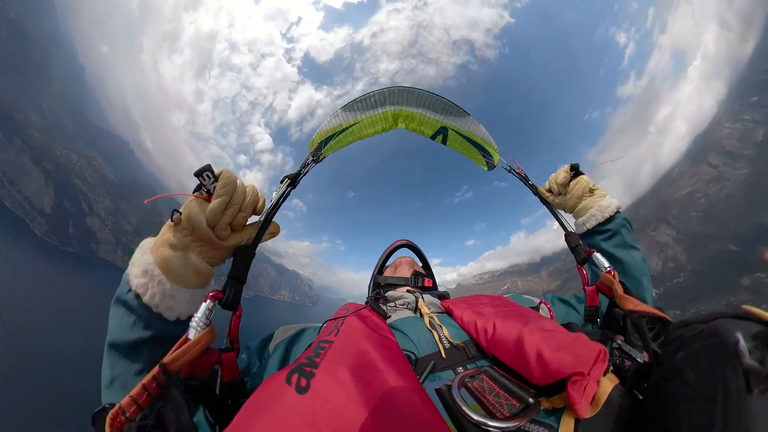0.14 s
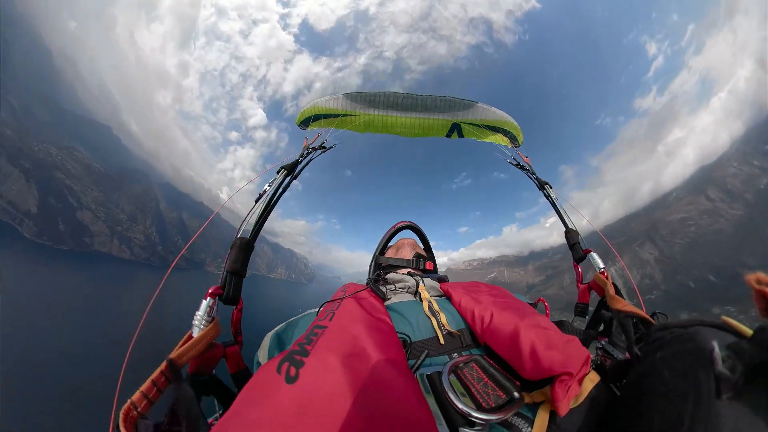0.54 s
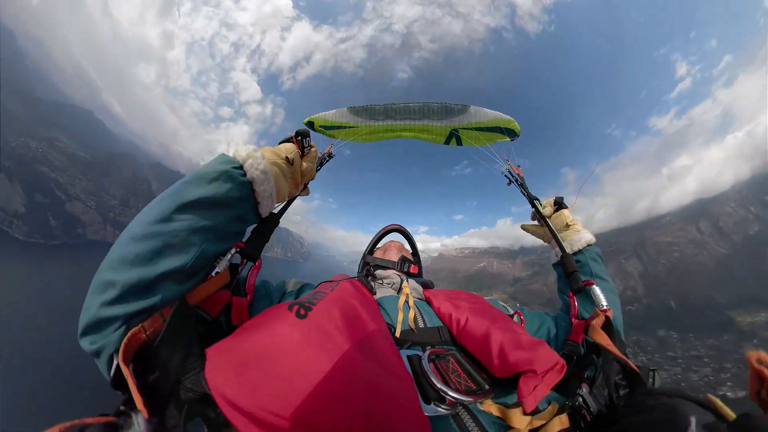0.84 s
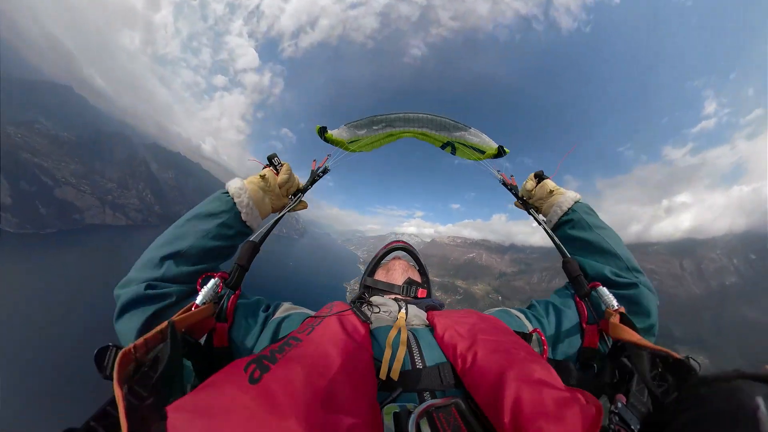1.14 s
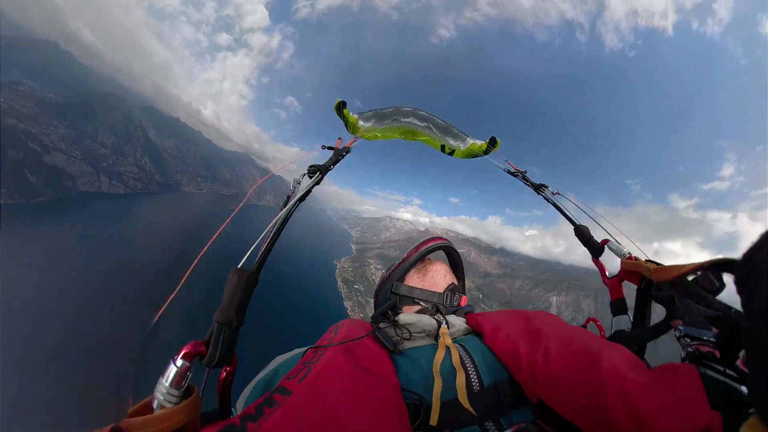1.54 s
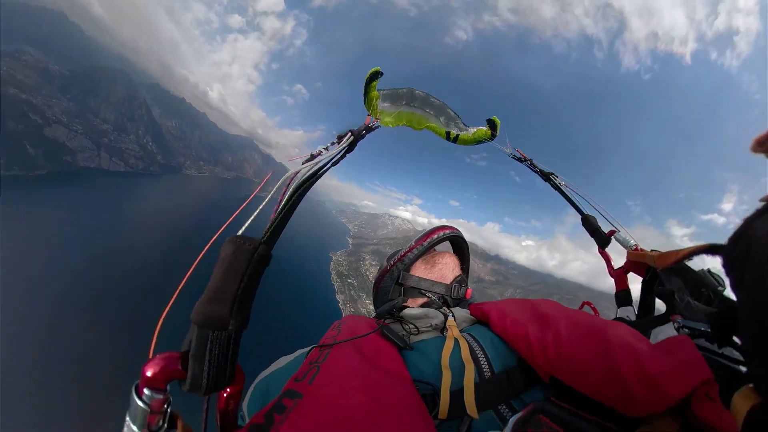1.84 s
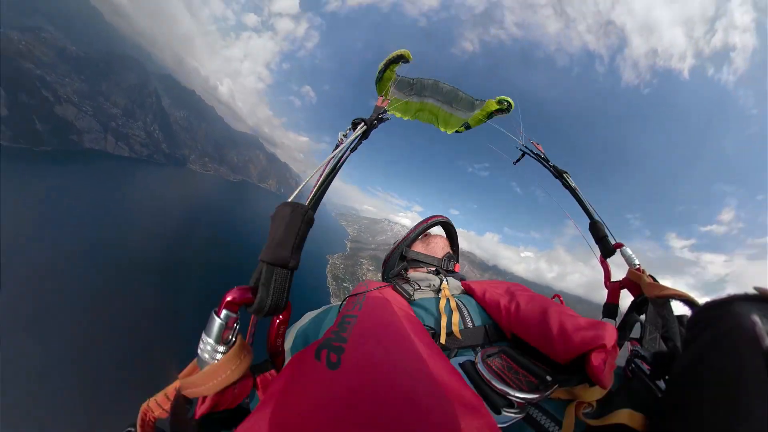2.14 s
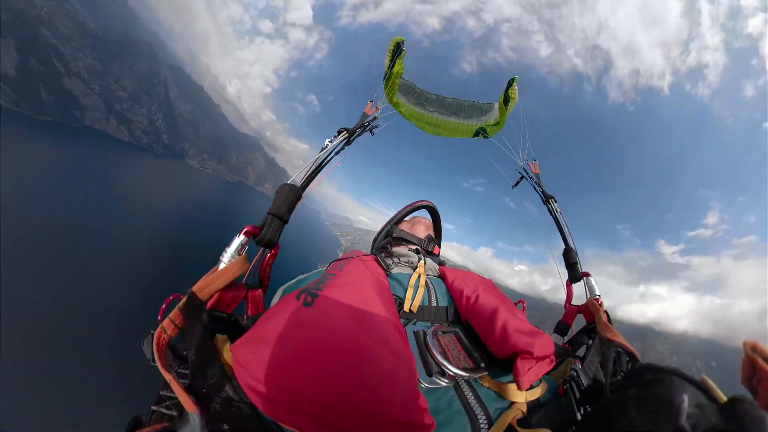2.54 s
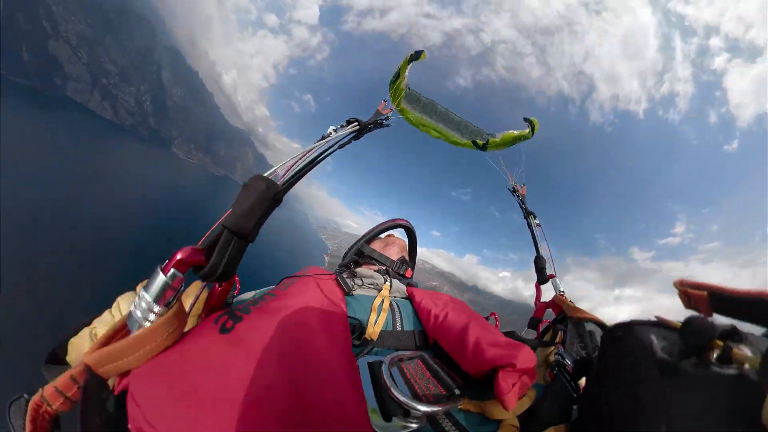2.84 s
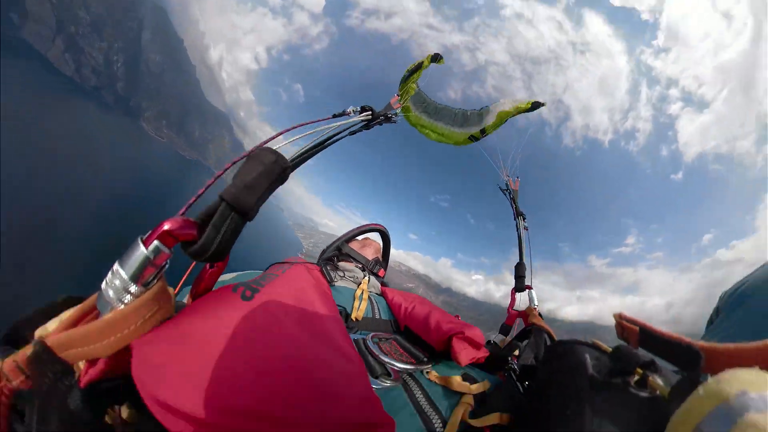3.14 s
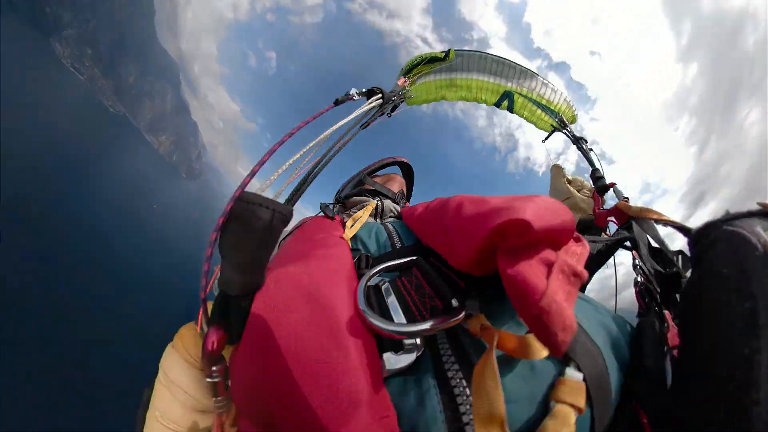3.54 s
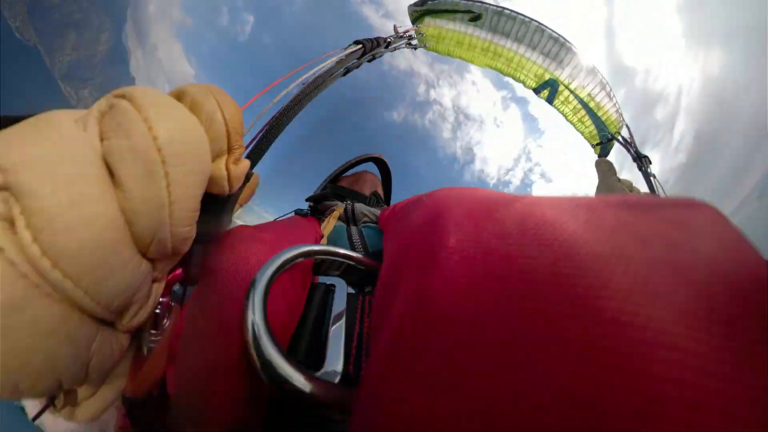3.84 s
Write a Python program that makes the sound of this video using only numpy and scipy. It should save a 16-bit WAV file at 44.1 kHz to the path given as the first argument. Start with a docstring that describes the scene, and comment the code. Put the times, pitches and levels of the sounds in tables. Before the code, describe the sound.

Gusty wind roars on a paraglider pilot's microphone while webbing crackles and gear knocks in bursts

```python
"""High in gusty air, a microphone in a housing is strapped to a paraglider pilot.
Wind is noise in seven colours, from rumble to sizzle, that flickers with shared eddies; large eddies add
thumps, each a few cycles of a wave. Cloth and webbing crackle in random puffs of noise, and gear knocks with
a crack, a low body and a ring. Short chirps squeak, shaped noise scrapes and ticks, a strap buzzes briefly
in regular pulses, and sharp bright clicks sound as the input overloads."""
import sys
import numpy as np
from scipy import signal
from scipy.fft import rfft, irfft
from scipy.io import wavfile
from scipy.ndimage import uniform_filter1d

SR = 44100
rng = np.random.default_rng(int(sys.argv[2]) if len(sys.argv) > 2 else 0)


def unload_wav(signal):
    """Save mono or channel-first audio to the path in sys.argv[1] as 16-bit WAV at rate SR, clipped to [-1, 1]."""
    wavfile.write(
        sys.argv[1],
        SR,
        np.round(np.clip(np.atleast_2d(signal).T, -1, 1) * 32767).astype(np.int16),
    )


def invert_db(level):
    """Linear amplitude ratio for a level in decibels (20 dB per decade), elementwise."""
    return 10 ** (np.asarray(level, dtype=float) / 20)


N = 176400  # samples, 4 s
T = np.arange(N) / SR

# In every colour table below, level_db is per hertz and only the shape counts.

# Bright ticks, before a common lift: start_s, level_db, t60_s (time to fade by 60 dB)
TICKS = [(.435, -47.5, 0.021), (.664, -55, .02), (.671, -51.5, 0.04), (.751, -54, 0.032), (.759, -55, .02),
         (.787, -54, .02), (.81, -53, .02), (.835, -60.5, 0.026), (.87, -55, .03), (1.26, -58, 0.026)]
# Colour of the treble, for ticks and sizzle: pitch_hz, level_db
TREBLE_COLOUR = [(6000, -11), (8000, -20.5), (10000, -16.5), (11300, -9), (11900, -0.5), (12800, 1.5),
                 (13800, -6), (15300, -11.5), (15700, -32.5)]
# Sharp bright clicks as the input overloads, before colouring: start_s, level_db
OVERLOAD_CLICKS = [(1.7793, -45), (1.7962, -39.5), (1.8327, -40), (1.865, -54), (1.8763, -42),
                   (1.8973, -39), (1.908, -51), (1.9188, -41), (1.9295, -44), (1.9499, -41), (1.9549, -45),
                   (1.976, -44), (1.9826, -45), (1.993, -45)]
# Colour of the strap's buzz and of the overload clicks: pitch_hz, level_db
BUZZ_COLOUR = [(3000, -22.5), (5500, -4), (9000, -1.5), (11500, -7.5), (14500, -11), (15600, -47)]
# Short squeaks of a strap sliding: start_s, length_s, level_db, start_hz, end_hz
SQUEAKS = [(.8798, .0095, -24, 1330, 3300), (.3155, .010, -36, 3400, 3450), (.324, .012, -42, 2900, 3500)]
# A glove or strap scrapes past, before colouring: start_s, length_s, level_db
SCRAPES = [(.288, .06, -45), (.588, .016, -53), (.879, .018, -40)]
# Crackle of cloth and webbing under load: time_s, level_db
CRACKLE_LEVEL = [(0, -73), (.3, -62), (.5, -95), (.635, -75), (.66, -55), (1.1, -49), (1.4, -60),
                 (1.7, -53), (1.8, -46), (1.85, -41), (1.92, -41), (1.96, -45), (2.03, -43), (2.07, -56),
                 (2.45, -59), (2.7, -65), (2.95, -78), (3.05, -49), (3.28, -63), (3.33, -43), (3.39, -38),
                 (3.48, -45), (3.53, -59.5), (3.7, -54), (3.85, -66), (4, -61)]
# Colour of crackle heard through the housing: pitch_hz, level_db
HOUSING_COLOUR = [(100, -21), (300, -8.5), (600, -14.5), (950, 6.5), (1250, -7.5), (1700, -5.5),
                  (2500, -18), (3500, -25), (4000, -21), (5500, -34.5), (8000, -59.5), (15000, -96.5)]
# Knocks and snaps of the gear, before colouring: start_s, crack_db, body_re_crack_db, crack_t60_s
KNOCKS = [(0.4267, -37, 20.5, 0.0088), (0.4553, -37, 6, 0.011), (0.596, -50, -25, 0.0093),
          (0.6624, -27, 5.5, 0.011), (0.752, -46, 14, 0.023), (0.7756, -44, 11, 0.014),
          (0.9248, -34, -15, 0.023), (0.9547, -60, -10, 0.013), (1.4765, -41, -2, 0.015),
          (1.484, -27.5, -6, 0.024), (1.531, -37, -9, 0.016), (1.614, -41, 9, 0.013),
          (1.6374, -24, -3, 0.018), (1.708, -28, 2, 0.015), (1.7616, -45, 7.5, 0.019),
          (1.7824, -26, -1.5, 0.023), (1.8038, -27, -6, 0.023), (1.815, -25, 2, 0.031),
          (1.8297, -24, -5, 0.039), (1.8361, -21.5, -7, 0.018), (1.8428, -32.5, 16, 0.021),
          (1.8491, -18.5, -17, 0.014), (1.8539, -20, -15, 0.012), (1.8672, -17, -2, 0.015),
          (1.880, -34, 8, 0.02), (1.891, -22, 6.5, 0.0096), (1.8946, -19.5, -8, 0.013),
          (1.9048, -26.5, -3, 0.028), (1.911, -29, -3, 0.016), (1.921, -34, 1, 0.014),
          (1.9312, -26.5, -1, 0.013), (1.947, -27, -7, 0.015), (1.971, -26, -1.5, 0.026),
          (1.9905, -21, -11.5, 0.027), (2.001, -27, 4.5, 0.014), (2.0225, -31.5, 1.5, 0.025),
          (2.0348, -26, 5, 0.017), (2.084, -41, 15, 0.016), (2.092, -41.5, -5, 0.011),
          (2.110, -45, -8, 0.01), (2.1308, -34.5, 9.5, 0.0067), (2.178, -37.5, 4.5, 0.012),
          (2.1832, -41.5, 7.5, 0.011), (2.200, -49.5, 13, 0.013), (2.2538, -37, 8.5, 0.016),
          (2.2808, -45.5, 13.5, 0.0094), (2.2977, -41, 3, 0.012), (2.3032, -38.5, 12, 0.011),
          (2.318, -49, -2, 0.01), (2.3229, -33, 6, 0.011), (2.3655, -40, 9, 0.02),
          (2.380, -41.5, 10, 0.017), (2.4142, -43.5, 6.5, 0.01), (2.4383, -42, 17, 0.018),
          (2.462, -56, 10, 0.016), (2.4885, -47.5, 23, 0.02), (2.5594, -57, 19, 0.014),
          (2.603, -49, 9, 0.018), (2.6214, -46, -5, 0.016), (2.681, -50.5, 12, 0.016),
          (3.021, -45, 9, 0.021), (3.038, -31, 6, 0.015), (3.0457, -23.5, -3, 0.016),
          (3.061, -42, -5, 0.028), (3.0744, -35, 8, 0.023), (3.1058, -44.5, 17.5, 0.036),
          (3.142, -28.5, -5, 0.016), (3.2131, -20.5, -1, 0.014), (3.2222, -17, -13, 0.0091),
          (3.3224, -23.5, -0.5, 0.031), (3.3701, -23, -8, 0.014), (3.385, -31, 0, 0.021),
          (3.3935, -23.5, 6.5, 0.02), (3.3968, -17, 3, 0.0096), (3.4043, -19.5, -8, 0.016),
          (3.414, -33.5, 6, 0.012), (3.432, -35, 12, 0.02), (3.4368, -25, -1.5, 0.0095),
          (3.461, -30.5, 3, 0.014), (3.522, -37, 11.5, 0.016), (3.5266, -34, 13, 0.017),
          (3.5468, -30.5, 9, 0.0096), (3.5634, -15.5, -1, 0.0095), (3.565, -27.5, 6, 0.0099),
          (3.583, -35, 1.5, 0.014), (3.6515, -34.5, 9, 0.027), (3.6723, -35, 5.5, 0.017),
          (3.7266, -38, 1.5, 0.017), (3.9227, -15.5, -7, 0.013), (3.963, -38, 3, 0.015)]
# Colour of a knock's crack: pitch_hz, level_db
CRACK_COLOUR = [(600, -18.5), (1250, -1.5), (1700, 3.5), (2100, 1.5), (2500, -0.5), (3500, -8.5),
                (4000, -20), (5500, -25), (8000, -44.5), (15000, -72)]
# Colour of a knock's low body: pitch_hz, level_db
BODY_COLOUR = [(150, -30.5), (350, -2.5), (600, -3), (900, -0.5), (1100, -7.5), (1400, -14.5),
               (2200, -35.5), (5000, -88.5)]
# Ring of the housing and buckles, levels relative to each other: pitch_hz, level_db, t60_s
RING = [(900, -11, .045), (1650, -17, .03), (2350, -20, .08), (3300, -20, .025)]
# Deep thumps of large eddies: start_s, level_db, pitch_hz, length_cycles
THUMPS = [(0.316, -18, 127, 3.5), (0.425, -20.5, 148, 2.8), (0.673, -20.5, 268, 4.1),
          (0.752, -20.5, 255, 1.9), (0.766, -19, 277, 6), (0.826, -17.5, 113, 2), (0.888, -14.5, 96, 1.2),
          (0.956, -19, 89.6, 2.7), (1.595, -17, 115, 1.3), (1.754, -10.5, 88.5, 4), (2.759, -21, 89, 2.2),
          (2.875, -18.5, 134, 2.5), (3.36, -6.5, 90, 2.47), (3.396, -11, 129, 1.2), (3.44, -9.5, 110, 3.1),
          (3.543, -13, 141, 2.2), (3.517, -6, 156.4, 5), (3.566, -7, 170, 2), (3.726, -8.5, 158.6, 2.64)]
# Deep wind, one list for each spell: time_s, rumble_db, buffeting_db
GUSTS = [
    [(0.02, -17.5, -26), (0.054, -20, -47), (0.104, -26, -45), (0.336, -28.5, -25), (0.362, -33, -33.5),
     (0.58, -46, -34.5), (0.598, -22, -55), (0.63, -55, -50)],
    [(0.63, -59, -52), (0.642, -31.5, -37.5), (0.848, -45, -25.5), (0.87, -34, -33), (0.952, -26.5, -29.5),
     (1.396, -42, -43), (1.414, -32, -36.5), (1.58, -31, -40)],
    [(1.58, -37, -33), (1.602, -17.5, -33), (1.64, -12.5, -14.5), (1.678, -23.5, -42), (1.708, -13, -17.5),
     (1.732, -25, -36), (1.784, -16, -20), (2.06, -23, -16.5)],
    [(2.06, -19, -17), (2.436, -16.5, -31), (2.466, -17, -45), (2.5, -18, -23), (2.562, -21, -37),
     (2.896, -16.5, -27), (2.918, -14.5, -56), (2.96, -26, -60)],
    [(2.96, -27, -75), (2.976, -18.5, -28), (3.02, -20.5, -42), (3.034, -20.5, -27), (3.148, -16.5, -20.5),
     (3.212, -8, -24), (3.276, -31.5, -25.5), (3.31, -24, -32)],
    [(3.31, -13, -34), (3.358, -14.5, -20.5), (3.572, -22, -18.5), (3.618, -15.5, -33.5),
     (3.646, -25, -16.5), (3.786, -13, -35), (3.804, -20, -34.5), (3.98, -23, -22)],
]
# Middle wind, one list for each spell: time_s, flutter_db, roar_db
FLOW = [
    [(0.0, -20, -32.5), (0.035, -29.5, -47), (0.09, -45.5, -48.5), (0.154, -42.5, -50), (0.246, -36, -46),
     (0.344, -44, -38), (0.362, -44, -43), (0.41, -43, -44.5), (0.432, -35, -43), (0.494, -42, -44),
     (0.575, -45, -50.5), (0.628, -43, -51)],
    [(0.632, -47, -55), (0.642, -37.5, -38), (0.68, -29, -34.5), (0.73, -31, -44), (0.76, -30.5, -33),
     (0.838, -31, -37.5), (1.15, -40.5, -46), (1.172, -52, -45), (1.242, -36.5, -43), (1.384, -44.5, -47),
     (1.462, -32, -46), (1.58, -33.5, -42.5)],
    [(1.58, -39, -46), (1.6, -21.5, -51), (1.624, -20, -38), (1.692, -41.5, -51), (1.72, -29, -46),
     (1.844, -30, -33), (1.964, -33, -37), (2.014, -23, -32.5), (2.06, -31, -41.5)],
    [(2.06, -35, -44.5), (2.23, -59.5, -54), (2.268, -38.5, -44.5), (2.508, -40.5, -55.5),
     (2.518, -46.5, -59.5), (2.7, -45, -57), (2.76, -33.5, -43), (2.868, -36.5, -52.5), (2.96, -61, -59.5)],
    [(2.96, -45, -54), (3.018, -52, -64), (3.032, -38.5, -52), (3.076, -39.5, -45), (3.146, -31, -46.5),
     (3.214, -40, -50.5), (3.304, -51, -47.5), (3.31, -35, -55.5)],
    [(3.31, -42.5, -60), (3.388, -19, -35), (3.496, -34, -47.5), (3.532, -20, -34), (3.63, -42.5, -64),
     (3.742, -29.5, -45.5), (3.836, -56, -61), (3.866, -39, -53), (3.98, -35.5, -61.5)],
]
# Hiss of the airflow: time_s, level_db
HISS_LEVEL = [(0, -51), (.15, -63.5), (.25, -54.5), (.38, -52.5), (.5, -58.5), (.62, -59.5), (.67, -53.5),
              (.85, -48), (1.07, -52), (1.2, -55.5), (1.38, -58.5), (1.55, -56.5), (1.65, -53.5),
              (1.72, -59.5), (1.87, -49), (1.97, -58), (2.06, -63.5), (2.2, -72), (2.5, -71.5), (2.68, -70),
              (2.76, -57.5), (2.9, -61), (2.96, -68.5), (3.03, -59.5), (3.2, -61), (3.3, -59), (3.4, -48.5),
              (3.5, -61.5), (3.63, -64), (3.74, -59), (3.85, -64.5), (4, -65.5)]
# Bright sizzle: time_s, level_db
SIZZLE_LEVEL = [(0, -100), (.3, -100), (.42, -76), (.47, -67.5), (.62, -74), (.68, -63), (.85, -62.5),
                (.95, -65.5), (1.1, -63.5), (1.25, -63), (1.4, -67), (1.6, -64.5), (1.8, -69), (1.86, -100),
                (2.1, -115), (4, -115)]
# Duller sizzle: time_s, level_db
FIZZ_LEVEL = [(0, -68), (.2, -84.5), (.27, -73.5), (.4, -74), (.5, -81), (.65, -84), (.8, -78),
              (1.6, -77.5), (1.85, -110), (4, -115)]
# Colours of the wind layers, from deep to bright: pitch_hz, level_db
RUMBLE_COLOUR = [(10, -9), (20, 7), (35, 4), (55, -2), (75, -20), (110, -30.5), (200, -70), (600, -120)]
BUFFET_COLOUR = [(30, -36), (55, -1.5), (75, 1), (110, -2.5), (160, -8), (220, -24.5), (350, -31.5),
                 (600, -65.5), (1500, -120)]
FLUTTER_COLOUR = [(70, -40), (130, -2.5), (180, 3), (280, -2.5), (380, -12.5), (500, -20.5), (800, -24.5),
                  (1200, -59), (3000, -120)]
ROAR_COLOUR = [(200, -26.5), (380, -0.5), (500, -1.5), (700, -7), (900, -10.5), (1050, -11.5), (1250, -19),
               (2000, -36.5), (5000, -100)]
HISS_COLOUR = [(700, -23), (1200, -6), (1650, -2), (2000, -8), (2450, -1.5), (3000, -5.5), (3500, -9),
               (3900, -15.5), (5000, -19), (6500, -29.5), (8500, -53), (12000, -77)]
FIZZ_COLOUR = [(5000, -26), (8000, -8.5), (10300, -3), (12000, -7), (13500, -17.5), (15600, -44)]

RISE_S = .0012  # time a puff takes to reach full strength


def evened(x):
    """Scales a sound to an average (rms) strength of 1."""
    return x / np.sqrt(np.mean(x ** 2) + 1e-20)


def read(points, hz):
    """Reads a colour table at any pitch, with pitch spaced as the ear hears it."""
    table_hz, level_db = np.transpose(points)
    return np.interp(np.log(hz + 1), np.log(table_hz + 1), level_db)


def curve(table, count):
    """Turns one level column into a smooth loudness curve."""
    rows = np.vstack(table)
    level_db = np.interp(T, rows[:, 0], rows[:, count])
    return invert_db(uniform_filter1d(level_db, size=400))


def add(mix, s, sound):
    """Adds a sound into the mix at s seconds, cut off at the end."""
    part = mix[round(s * SR):][:len(sound)]
    part += sound[:len(part)]


def coloured(x, points):
    """Filters a sound to the given colour; the filter responds only after its input."""
    hz = abs(np.fft.fftfreq(8192, 1 / SR))
    log_gain = np.log(invert_db(read(points, hz)))
    # this phase packs the response as early as it can be
    phase = -signal.hilbert(log_gain).imag
    taps = np.fft.ifft(np.exp(log_gain + 1j * phase)).real[:4096]
    return signal.oaconvolve(x, taps / np.linalg.norm(taps))[:len(x)]


def puffs(rows):
    """Loudness of sudden puffs that rise fast and die away, from rows of start_s, level_db, t60_s."""
    out, t = np.zeros(N), T[:4000]
    for s, db, t60 in rows:
        rise = np.minimum(t / RISE_S, 1)
        add(out, s, rise * invert_db(db - 60 * t / max(t60, .004)))
    return out


def ticks():
    """Each bright tick is a dying puff of treble noise."""
    colour = [(5000, -19.5), (7000, -12.5)] + TREBLE_COLOUR[2:]
    return invert_db(3.0) * coloured(puffs(TICKS) * rng.standard_normal(N), colour)


def strap_buzz():
    """A strap buzzes against the housing in nearly regular short pulses of uneven force."""
    start_s, end_s, rate_hz, jitter_s = 1.7855, 2.012, 188, .00015
    level_db, spread_db = -58, 6  # before colouring
    at_s = np.arange(start_s, end_s, 1 / rate_hz)
    at_s = at_s + jitter_s * rng.standard_normal(len(at_s))
    force = np.minimum(rng.standard_normal(len(at_s)), 1.2)
    pulses = np.zeros(N)
    pulses[(at_s * SR).astype(int)] = invert_db(level_db + spread_db * force)
    return coloured(pulses, BUZZ_COLOUR)


def overload_clicks():
    """The overloading input gives sharp bright clicks, placed here at listed times."""
    start_s, level_db = np.transpose(OVERLOAD_CLICKS)
    clicks = np.zeros(N)
    clicks[(start_s * SR).astype(int)] = invert_db(level_db)
    return coloured(clicks, BUZZ_COLOUR)


def squeaks():
    """A sliding strap gives short upward chirps, slightly rough because the pitch wobbles."""
    out = np.zeros(N)
    for s, length, db, from_hz, to_hz in SQUEAKS:
        u = np.arange(0, length, 1 / SR) / length  # runs from 0 to 1
        wobble = 1 + .55 * uniform_filter1d(rng.standard_normal(2000), size=20)[:len(u)]
        hz = (from_hz + (to_hz - from_hz) * u ** 2) * wobble
        swell = np.sin(np.pi * u ** .45)
        add(out, s, invert_db(db) * swell * np.sin(2 * np.pi * np.cumsum(hz) / SR))
    return out


def scrapes():
    """Rubbing makes hissing noise that swells and fades."""
    rub = np.zeros(N)
    for s, length, db in SCRAPES:
        add(rub, s, invert_db(db) * np.hanning(round(length * SR)))
    return coloured(rub * rng.standard_normal(N), HISS_COLOUR)


def crackle():
    """Random snaps of uneven size, each a dying puff of noise heard through the housing."""
    snaps_per_s, spread_db, t60_s = 320, 5, .011
    size = invert_db(spread_db * np.minimum(rng.exponential(1, N), 3))
    snaps = size * (rng.random(N) < snaps_per_s / SR)
    fading = signal.lfilter([1], [1, -invert_db(-60 / t60_s / SR)], snaps)
    noise = coloured(fading * rng.standard_normal(N), HOUSING_COLOUR)
    return curve(CRACKLE_LEVEL, count=1) * evened(noise)


def knocks():
    """Each knock has a sharp impact, a crack and a low body; crack and body set the housing ringing."""
    start_s, crack_db, body_re_crack_db, t60_s = np.transpose(KNOCKS)
    body_db = crack_db + body_re_crack_db
    crack = puffs(np.c_[start_s, crack_db, t60_s]) * rng.standard_normal(N)
    body = puffs(np.c_[start_s, body_db, 1.3 * t60_s]) * rng.standard_normal(N)
    # one sharp click as the puff reaches full strength
    first = ((start_s + RISE_S) * SR).astype(int)
    snap, push = np.zeros(N), np.zeros(N)
    snap[first] = 3.5 * invert_db(crack_db)
    push[first] = 4 * invert_db(body_db)
    crack, body = crack + snap, body + push
    t = T[:8000]
    ring = sum(invert_db(db - 60 * t / t60) * np.sin(2 * np.pi * hz * t) for hz, db, t60 in RING)
    ringing = signal.oaconvolve(invert_db(-31) * crack + invert_db(-36.5) * body, ring)[:N]
    return invert_db(-10.0) * coloured(crack, CRACK_COLOUR) + invert_db(-4.5) * coloured(body, BODY_COLOUR) + ringing


def thumps():
    """A large eddy swings the pressure at the microphone port for a few cycles."""
    out = np.zeros(N)
    for s, db, hz, cycles in THUMPS:
        u = np.arange(0, cycles / hz, 1 / SR) * hz / cycles  # runs from 0 to 1
        swell = np.sin(np.pi * u ** 0.56) ** 2  # grows faster than it fades
        add(out, s, invert_db(db) * swell * np.sin(2 * np.pi * cycles * u))
    return out


def lumps(top_hz):
    """Slow random ups and downs, about equally strong in each octave from 7 Hz to near top_hz."""
    hz = np.fft.rfftfreq(N, 1 / SR)
    weight = (hz > 7) / np.sqrt(hz + 1) / (1 + (hz / top_hz) ** 4)
    return evened(irfft(rfft(rng.standard_normal(N)) * weight, N))


def air(points, eddies, shared_db, own_db, own_hz):
    """Noise of one colour that flickers with the shared eddies and on its own."""
    flicker = invert_db(shared_db * eddies + own_db * lumps(own_hz))
    return evened(flicker) * evened(coloured(rng.standard_normal(N), points))


def wind():
    """Turbulent air rumbles, roars and hisses; the same passing eddies make every layer flicker."""
    eddies = lumps(34)
    rumble = air(RUMBLE_COLOUR, eddies, shared_db=.25, own_db=.52, own_hz=17)
    buffeting = air(BUFFET_COLOUR, eddies, shared_db=.81, own_db=.77, own_hz=30)
    flutter = air(FLUTTER_COLOUR, eddies, shared_db=1.0, own_db=1.0, own_hz=50)
    roar = air(ROAR_COLOUR, eddies, shared_db=1.9, own_db=.99, own_hz=90)
    hiss = air(HISS_COLOUR, eddies, shared_db=.9, own_db=1.1, own_hz=150)
    sizzle = air(TREBLE_COLOUR, eddies, shared_db=.7, own_db=1.5, own_hz=200)
    fizz = air(FIZZ_COLOUR, eddies, shared_db=.7, own_db=1.9, own_hz=200)
    return (curve(GUSTS, count=1) * rumble
            + curve(GUSTS, count=2) * buffeting
            + curve(FLOW, count=1) * flutter
            + curve(FLOW, count=2) * roar
            + curve(HISS_LEVEL, count=1) * hiss
            + curve(SIZZLE_LEVEL, count=1) * sizzle
            + curve(FIZZ_LEVEL, count=1) * fizz)


def scene():
    """Adds all the sources into one channel."""
    gear = ticks() + strap_buzz() + squeaks() + scrapes() + crackle() + knocks()
    return (gear + overload_clicks() + thumps() + wind())[None]


def low_pass(x):
    """Removes everything above the highest recorded frequency."""
    return signal.sosfilt(signal.butter(12, 15760, fs=SR, output="sos"), x)


def record(dry):
    """The input stage rounds off the largest swings."""
    mix = .5 * np.tanh(dry / .5)
    return low_pass(mix)


dry = scene()
out = record(dry)
unload_wav(out)
```